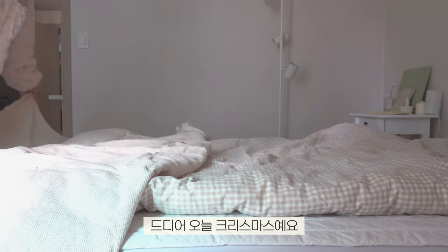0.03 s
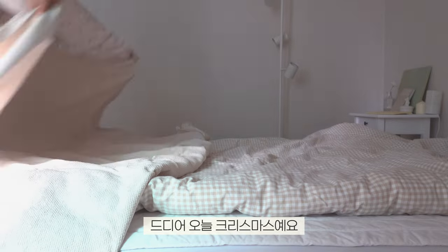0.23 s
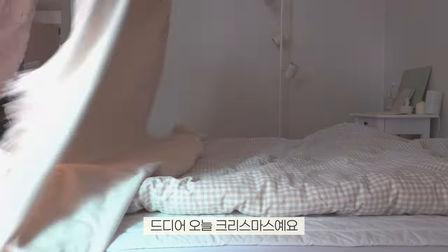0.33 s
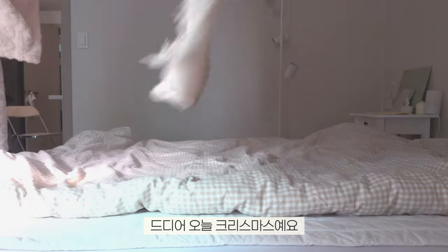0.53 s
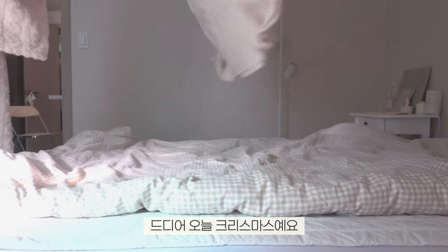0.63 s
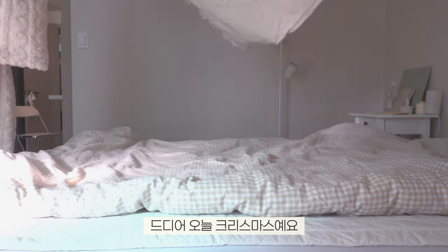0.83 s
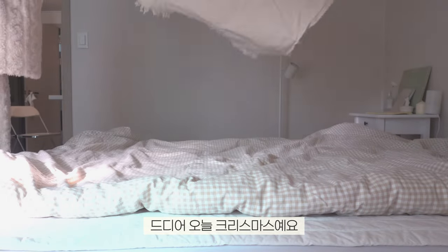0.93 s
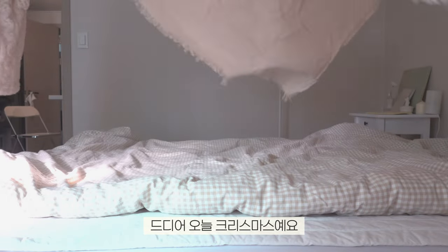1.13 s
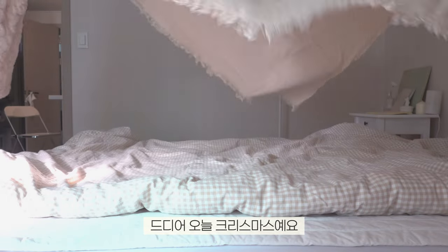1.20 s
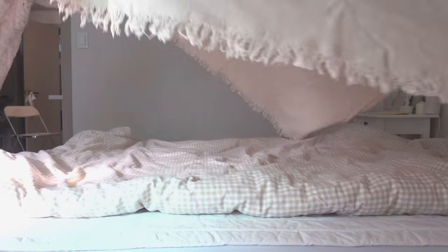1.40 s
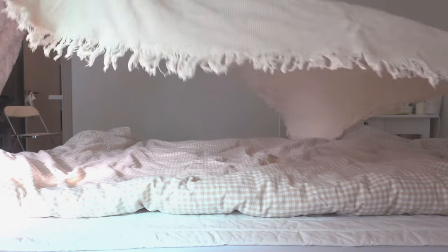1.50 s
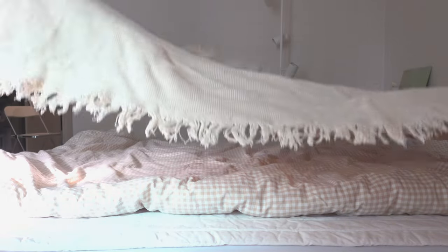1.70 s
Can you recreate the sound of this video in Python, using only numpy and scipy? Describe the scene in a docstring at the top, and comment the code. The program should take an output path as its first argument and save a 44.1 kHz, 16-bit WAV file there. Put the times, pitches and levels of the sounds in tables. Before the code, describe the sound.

A blanket is dragged off a bed with a rustle, then flung up in a low whoosh, flapping and snapping taut with a dull whump. It hisses softly as it billows down, heard close in a quiet bedroom.

```python
"""A blanket flung over a bed

A fringed blanket is dragged off a bed, flung upward and left to billow down in a quiet bedroom.
Friction makes the weave rasp, and the moving sheet sheds eddies and slow pressure waves. Slack folds
flap, the fringe ticks and the edge cracks taut with a dull whump; then the spread cloth hisses softly
through the air. The small room booms and a limiter holds the peaks."""
import sys
import numpy as np
from scipy import signal
from scipy.fft import rfft, irfft, next_fast_len
from scipy.io import wavfile
from scipy.ndimage import uniform_filter1d, minimum_filter1d, map_coordinates

SR = 44100
rng = np.random.default_rng(int(sys.argv[2]) if len(sys.argv) > 2 else 0)


def dump(signal):
    """Clip the signal to [-1, 1] and save it as 16-bit WAV at the path in sys.argv[1]."""
    limited = np.clip(np.atleast_2d(signal).T, -1, 1)
    pcm = np.round(limited * 32767).astype(np.int16)
    wavfile.write(sys.argv[1], SR, pcm)


N = 77175


def amp(db):
    """Amplitude ratio: a factor of ten for every 20 dB."""
    return 10 ** (np.asarray(db) / 20)


def unit(x):
    """Normalisation to rms 1."""
    return x / np.sqrt(np.mean(x ** 2) + 1e-20)


def clock():
    """Uniform sampling: the time of each sample in seconds."""
    return np.arange(N) / SR


def along(points, hz):
    """Interpolation of (Hz, value) points on a logarithmic frequency axis."""
    knots_hz, values = np.transpose(points)
    return np.interp(np.log(hz + 1), np.log(knots_hz + 1), values)


def hump(hz, centre, octaves):
    """A Lorentzian peak of height 1 in log frequency, with its half-width in octaves."""
    return 1 / (1 + (np.log2((hz + 1) / centre) / octaves) ** 2)


def filtered(x, response):
    """Linear filtering: the spectrum of x times a frequency response."""
    size = next_fast_len(N + SR // 4)
    return irfft(rfft(x, size) * response(np.fft.rfftfreq(size, 1 / SR)), size)[:N]


def shaped_noise(response):
    """White noise takes on the shape of a frequency response; rms 1."""
    return unit(filtered(rng.standard_normal(N), response))


def noise(spectrum):
    """Coloured noise of rms 1, its spectral density following (Hz, dB) points."""
    return shaped_noise(lambda hz: amp(along(spectrum, hz)))


def wobble(per_second):
    """Random modulation: a smooth curve through evenly spaced Gaussian values."""
    return map_coordinates(rng.standard_normal(1024), [clock() * per_second], mode="wrap")


def swell(peak_s, rise, fall):
    """A Gaussian envelope with a different width on each side of its peak."""
    t = clock() - peak_s
    return np.exp(-.5 * (t / np.where(t < 0, rise, fall)) ** 2)


def burst(start, t60, attack_s=.0004):
    """Exponential decay, 60 dB in t60 seconds, after a quick attack."""
    t = np.maximum(clock() - start, 0)
    return (1 - np.exp(-(t / attack_s) ** 2)) * np.exp(-np.log(1000) * t / t60)


def hush():
    """Ambient noise: the steady floor of a still room."""
    # Each row: frequency in Hz, relative spectral density in dB.
    room_spectrum = [(20, -9.5), (50, 0), (70, -20), (120, -16.5), (165, -6), (200, -10.5), (270, -7.5),
                     (500, -13), (1000, -21.5), (2000, -26), (4000, -32.5), (8000, -33.5), (11000, -39),
                     (15500, -40)]
    return amp(-40.5) * noise(room_spectrum)


def fibres(spectrum, tint_db=lambda hz: 0, slips_per_s=4400, slip_share=0.39):
    """Stick-slip friction: threads catch and let go in tiny impulses over a smooth hiss."""
    slips = unit(rng.standard_normal(N) * (rng.random(N) < slips_per_s / SR))
    friction = np.sqrt(slip_share) * slips + np.sqrt(1 - slip_share) * rng.standard_normal(N)
    response = lambda hz: amp(along(spectrum, hz) + tint_db(hz)) * hz / (hz + 200)  # bass rolls off
    return unit(filtered(friction, response))


def rubbing(rough_db=1, rasp_db=5):
    """Friction of cloth on cloth, on the bed and in the air: each stroke rasps around its own pitch."""
    # Strokes of cloth on cloth. Each row: peak time, rise and fall in seconds, level in dB,
    # tilt in dB per octave, pitch of the rasp in Hz.
    strokes = [(0.059, 0.047, 0.047, -40, -0.85, 2510), (0.213, 0.041, 0.015, -37, 0.5, 1860),
               (0.244, 0.043, 0.022, -31, -1.2, 2900), (.284, 0.012, .012, -35, -0.5, 6900),
               (0.318, 0.013, 0.024, -31.5, -1.4, 5670), (0.393, 0.011, 0.019, -28, -5.2, 1380),
               (0.391, 0.082, 0.071, -34.5, -0.5, 11800), (0.496, 0.017, 0.016, -33, 1, 4240),
               (.492, 0.013, 0.0098, -38, 3, 13700), (1.095, 0.0047, 0.0057, -43, -1, 1500),
               (1.35, 0.033, 0.055, -44.5, -4.5, 862)]
    # Each row: frequency in Hz, relative spectral density in dB.
    rub_spectrum = [(200, 9), (600, 0.5), (1200, 4), (1900, 0.5), (3800, -4), (6200, -5), (8700, -8),
                    (10200, -13), (15500, -14.5)]
    out = np.zeros(N)
    for peak_s, rise, fall, db, tilt, pitch in strokes:
        tint_db = lambda hz: tilt * np.log2(hz / pitch + .05) + rasp_db * hump(hz, pitch, octaves=0.43)
        out += amp(db) * swell(peak_s, rise, fall) * fibres(rub_spectrum, tint_db)
    return out * amp(rough_db * wobble(per_second=90.8))


def whoosh(flutter_db=-0.8, half_width_hz=46.4):
    """Vortex shedding: a hollow band of eddies over the broad turbulence behind the sheet."""
    # Air pushed by the cloth; the eddies shrink and rise in pitch as the narrow tail whips past.
    # Each row: time in seconds, level in dB, pitch of the eddies in Hz.
    airflow = [(0, -47.5, 240.1), (0.171, -48, 219.1), (.25, -43.5, 185), (0.304, -30, 169.3),
               (0.348, -27, 160.8), (0.398, -26.5, 142.9), (0.461, -25, 116.6), (.52, -20, 163.3),
               (0.548, -22, 218.9), (0.592, -22, 235.3), (.65, -30, 258.5), (.72, -40.5, 250),
               (.8, -45, 258.7), (0.998, -49, 280), (1.162, -39, 340), (1.351, -52.5, 370),
               (1.552, -50.5, 330), (1.75, -39, 277.2)]
    # Each row: frequency in Hz, relative spectral density in dB.
    wake_spectrum = [(50, 1), (100, -4), (180, 1.5), (330, 0), (500, -5), (900, -12.5), (1500, -19),
                     (2600, -34.5), (8000, -77)]
    times, db, pitch = np.transpose(airflow)
    phase = 2 * np.pi * np.cumsum(np.interp(clock(), times, pitch)) / SR
    # Two slow noises in quadrature spread the gliding pitch into a band.
    drift = lambda: shaped_noise(lambda hz: 1 / (1 + (hz / half_width_hz) ** 4))
    eddies = drift() * np.cos(phase) + drift() * np.sin(phase)
    envelope = amp(np.interp(clock(), times, db) + flutter_db * wobble(per_second=70.1))
    return envelope * (amp(-6) * eddies + amp(-3.5) * noise(wake_spectrum))


def heave():
    """Air displacement: the heaving sheet makes slow pressure waves, and the room booms at 50 Hz."""
    # Each row: time in seconds, level in dB.
    heave_levels = [(0, -36.5), (.24, -33.5), (.31, -16.5), (.36, -30), (.45, -16.5), (.53, -17.5),
                    (.66, -23), (.76, -29), (.94, -32.5), (1.04, -32.5), (1.15, -29.5), (1.3, -29),
                    (1.45, -38), (1.75, -34.5)]
    # Each row: frequency in Hz, relative spectral density in dB.
    pressure_spectrum = [(4, -24), (14, 0), (30, -1), (39, -9), (50, 2), (60, -13), (80, -19), (110, -22),
                         (160, -40), (400, -70)]
    times, db = np.transpose(heave_levels)
    return amp(np.interp(clock(), times, db)) * noise(pressure_spectrum)


def flaps():
    """Compression and rarefaction: each fold pulled taut gives the air one push and one pull."""
    # Each row: centre time in seconds, peak level in dB, width in milliseconds.
    folds = [(0.298, -17, 1.04), (0.318, -24.5, 1.55), (0.38, -14.5, 2.7), (.446, -13, 2.3),
             (0.5234, -3.5, 1.01), (.532, -16.5, 0.73), (.579, -12, 0.86), (.596, -24.5, 1.1)]
    out = np.zeros(N)
    for centre_s, db, width_ms in folds:
        u = (clock() - centre_s) / (width_ms / 1000)
        out -= amp(db) * u * np.exp(.5 * (1 - u * u))  # derivative of a Gaussian
    return out


def tassels():
    """Impact noise: the tassels of the fringe whip and strike in short, bright ticks."""
    # Each row: start in seconds, level in dB, pitch in Hz.
    strikes = [(.4775, -27, 3500), (.4855, -28, 8800), (.497, -29, 10000), (.5402, -23.5, 7000),
               (.5426, -23, 8000), (.5515, -31, 12000), (.6492, -37, 9500)]
    tick = lambda pitch: shaped_noise(lambda hz: hump(hz, pitch, octaves=.36))
    return sum(amp(db) * burst(start, t60=.013) * tick(pitch) for start, db, pitch in strikes)


def cracks():
    """Pressure transients: the edge snaps taut, then shakes out in weaker cracks."""
    # Each row: start in seconds, level in dB.
    snaps = [(0.5186, -12), (0.53, -21.5), (0.553, -27.5), (0.576, -39), (0.6, -37)]
    # Each row: frequency in Hz, relative spectral density in dB.
    crack_spectrum = [(150, -3), (430, 5), (750, 3), (950, 0), (1250, -4.5), (1800, -8), (2600, -17),
                      (6000, -22.5), (15000, -47)]
    envelope = np.zeros(N)
    for start, db in snaps:
        front = amp(-0.5) * burst(start, t60=0.01)
        puff = burst(start, t60=0.044)
        envelope += amp(db) * (front + puff)
    return envelope * noise(crack_spectrum)


def billow(rough_db=1):
    """Light friction: the airborne cloth and its fringe hiss as they slide over themselves."""
    # Each row: peak time, rise and fall in seconds, level in dB.
    swells = [(0.554, 0.012, 0.083, -40), (.82, 0.047, 0.032, -54.5), (1.152, 0.098, 0.095, -45.5),
              (1.358, 0.029, 0.038, -44.5), (1.45, .028, 0.036, -44.5), (1.68, .04, 0.082, -50)]
    # Each row: frequency in Hz, relative spectral density in dB.
    hiss_spectrum = [(300, 16), (1200, 0), (3000, -6.5), (5000, -4), (7800, -2.5), (10500, -8.5),
                     (13500, -8.5), (15800, -20)]
    envelope = sum(amp(db) * swell(peak_s, rise, fall) for peak_s, rise, fall, db in swells)
    return envelope * fibres(hiss_spectrum) * amp(rough_db * wobble(per_second=44.9))


def bedroom(x):
    """Reverberation: reflections from the walls die away exponentially, slowest in the bass."""
    # Each row: frequency in Hz, time to decay by 60 dB in seconds.
    decay_times = [(60, 0.54), (250, 0.59), (1000, 0.19), (4000, 0.36), (14000, 0.29)]
    hz, t, bands = signal.stft(rng.standard_normal(SR // 2), SR, nperseg=256)
    decay = np.exp(-np.log(1000) * t / along(decay_times, hz)[:, None])
    tail = signal.istft(bands * decay, SR, nperseg=256)[1]
    impulse_response = np.pad(tail / np.linalg.norm(tail), (SR // 200, 0))  # arrives 5 ms late
    return signal.fftconvolve(x, impulse_response)[:N]


def scene():
    """Superposition: cloth, air and reflections add to the room's hush in one channel."""
    rustle = rubbing() + billow() + whoosh()
    transients = flaps() + cracks() + tassels()
    reflections = bedroom(amp(-11.5) * transients + amp(-14.5) * rustle)
    return (rustle + transients + reflections + heave() + hush())[None]


def record(dry):
    """Peak limiting: the gain dips briefly around each loud peak; a low-pass cut follows."""
    ceiling_db, hold_s, cutoff_hz = -8.5, 0.0043, 15800
    window = int(hold_s * SR)
    needed_gain = np.minimum(1, amp(ceiling_db) / (np.abs(dry[0]) + 1e-9))
    smooth_gain = uniform_filter1d(minimum_filter1d(needed_gain, window), window)
    return filtered(dry[0] * smooth_gain, lambda hz: hz < cutoff_hz)[None]


dry = scene()
out = record(dry)
dump(out)
```